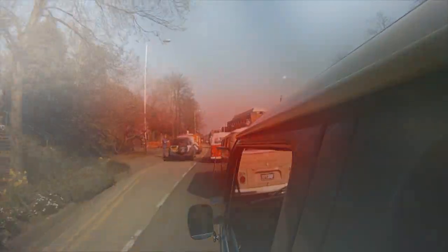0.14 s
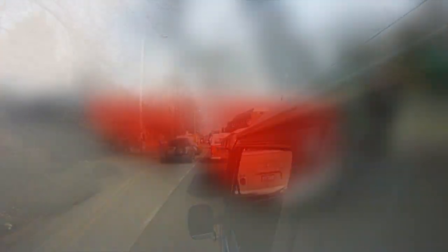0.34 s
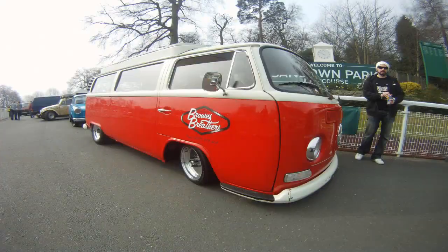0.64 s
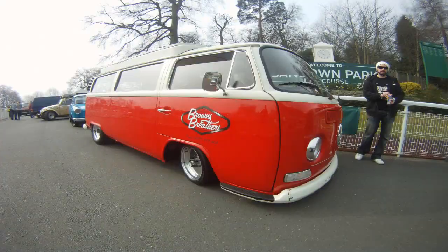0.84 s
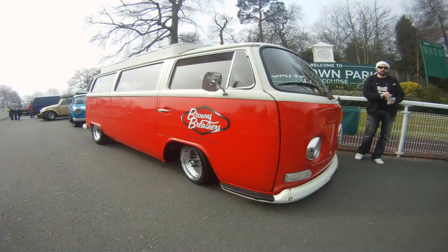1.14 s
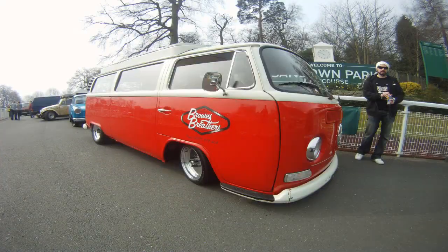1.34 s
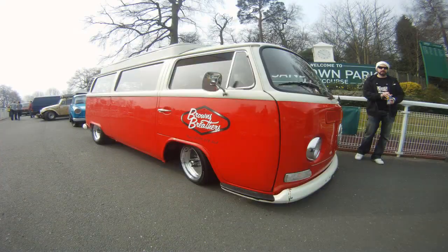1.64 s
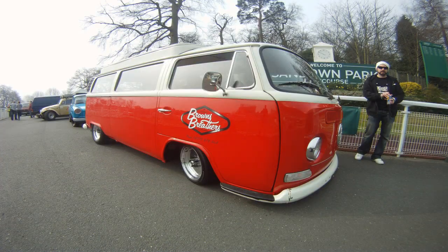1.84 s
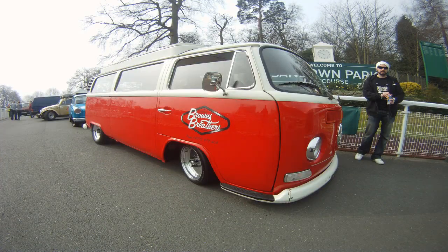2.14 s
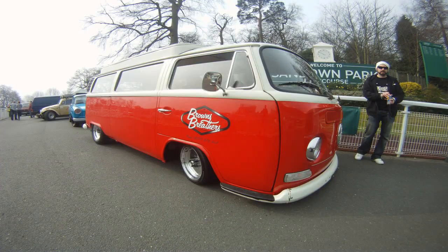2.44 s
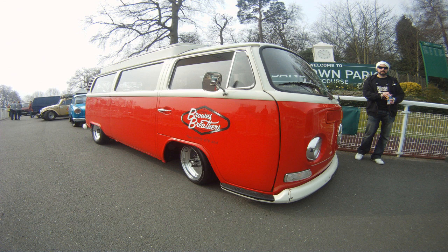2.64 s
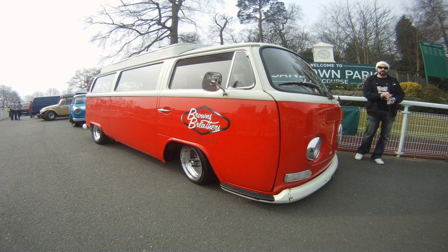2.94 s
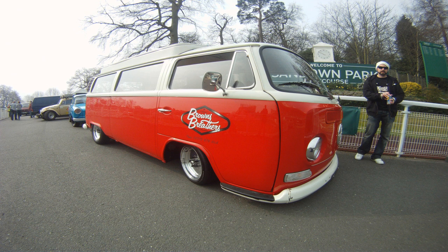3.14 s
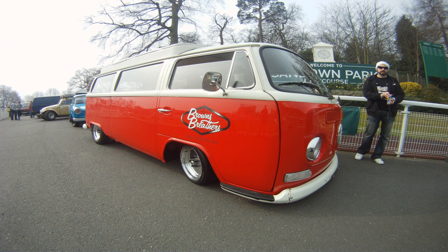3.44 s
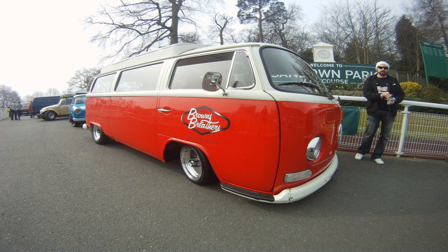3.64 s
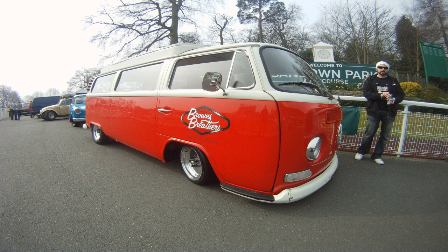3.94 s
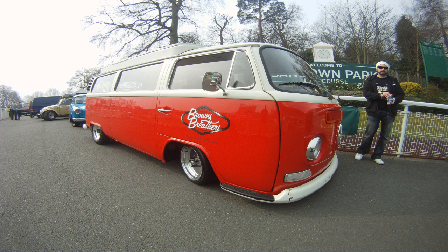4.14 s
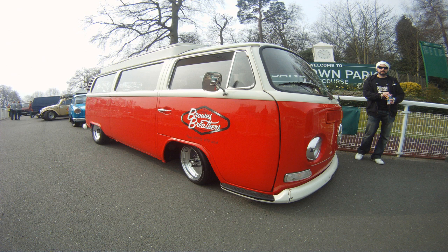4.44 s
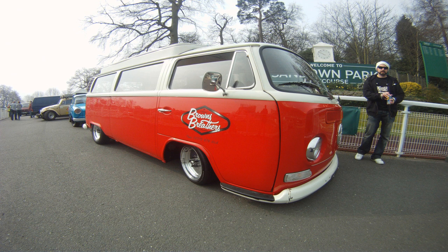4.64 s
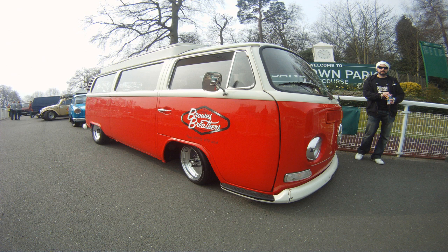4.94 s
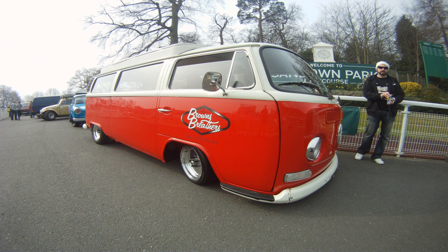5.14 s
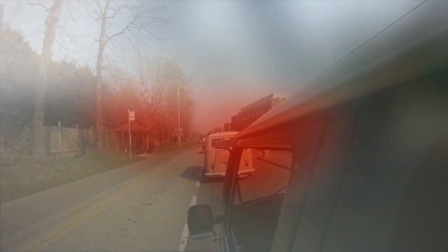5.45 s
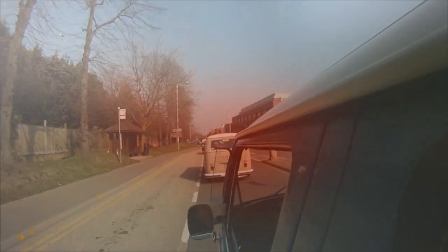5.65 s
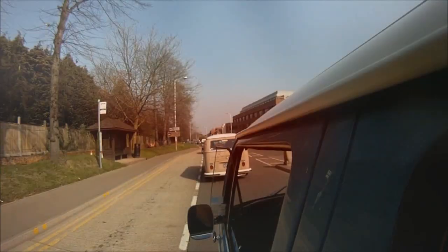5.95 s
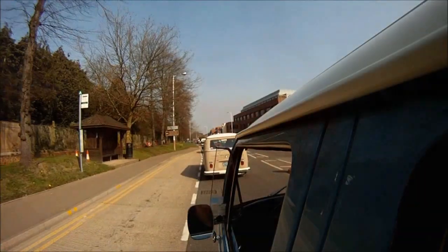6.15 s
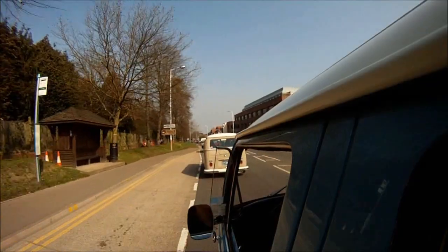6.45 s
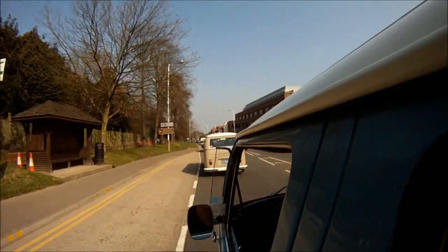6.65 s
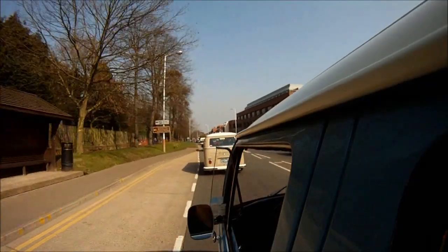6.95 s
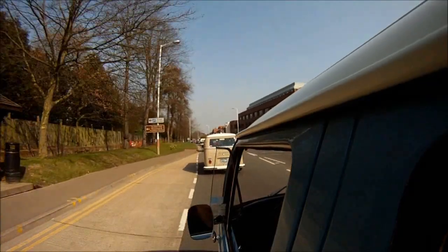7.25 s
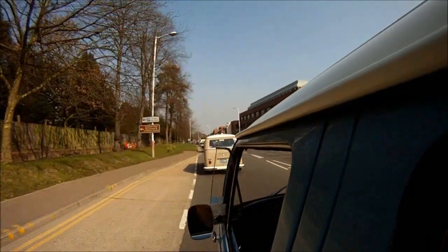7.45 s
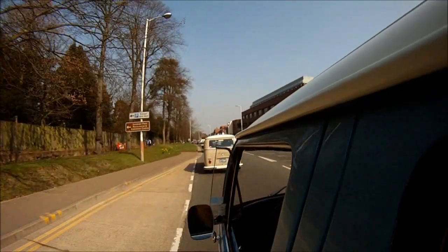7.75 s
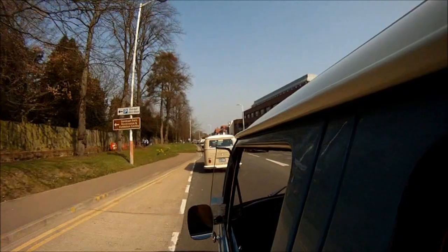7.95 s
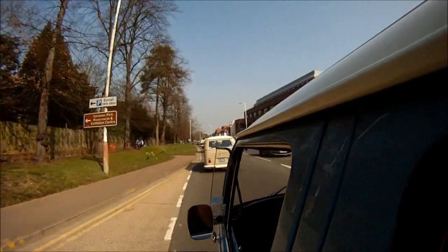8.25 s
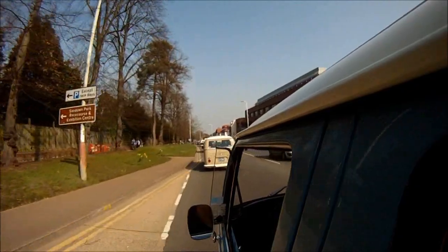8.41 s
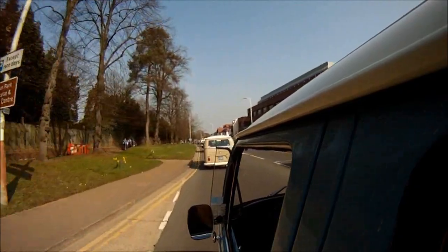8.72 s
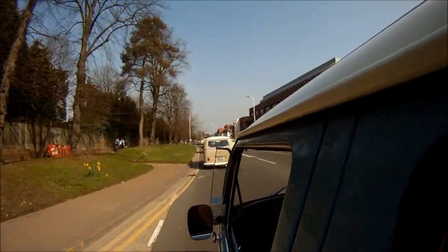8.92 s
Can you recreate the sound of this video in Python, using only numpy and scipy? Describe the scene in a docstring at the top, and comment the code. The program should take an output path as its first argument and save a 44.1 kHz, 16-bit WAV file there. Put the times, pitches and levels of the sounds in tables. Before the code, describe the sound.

An old van's air-cooled engine slows, then pulls away twice with rising growl, over road rumble, booming bumps and a brief metallic rattle.

```python
"""On the outside of an old van with an air-cooled flat four: it slows, then pulls away twice.
The engine is a set of tones (orders) that swell as they cross resonances on the way from the exhaust.
Road noise is random sound ringing in the steel shell; bumps swell a deep boom. A short metallic rattle is
bursts of uneven clicks that ring a metal part, steady tones hum, and a low drone climbs and fades early.
A small camera on the van's side samples at 12 kHz and holds each sample, mirroring sound into the treble."""
import sys
import numpy as np
from scipy import signal
from scipy.io import wavfile
from scipy.ndimage import uniform_filter1d

SR = 44100
rng = np.random.default_rng(int(sys.argv[2]) if len(sys.argv) > 2 else 0)


def amplitude_ratio(level_db):
    """Convert a level in decibels to the matching linear amplitude (field) ratio."""
    exponent = np.asarray(level_db, float) / 20
    return 10 ** exponent


def dump(signal):
    """Clip the signal to [-1, 1] and save it as 16-bit WAV at the path in sys.argv[1]."""
    limited = np.clip(np.atleast_2d(signal).T, -1, 1)
    pcm = np.round(limited * 32767).astype(np.int16)
    wavfile.write(sys.argv[1], SR, pcm)


N = 400428  # length in output samples
CAMERA_HZ, REPEAT = 12000, 4  # the camera's sample rate, and how many times it repeats each sample


def evened(x):
    """Scales a sound to rms 1."""
    return x / np.sqrt(np.mean(x ** 2) + 1e-20)


def columns(rows, t):
    """Reads each column of a curve at the times t."""
    s, *values = np.transpose(rows)
    return [np.interp(t, s, v) for v in values]


def split(hz, edge_hz, steep=3):
    """Share of the gain that lies above an edge; a larger steep makes a sharper edge."""
    return 1 / np.sqrt(1 + (edge_hz / (hz + 1e-3)) ** (2 * steep))


def wander(count, t, rate):
    """Rows of slow chance, rms 1, made of ten sines up to the rate in Hz, the slow ones strongest."""
    f = np.geomspace(rate / 12, rate, 10)
    phase = rng.random((count, len(f), 1))
    sines = np.sin(2 * np.pi * (f[:, None] * t + phase))
    return evened(np.sum(sines / np.sqrt(f)[:, None], 1))


def ringing(modes, hz, steep=1.36, floor_db=-62):
    """Gain of a set of resonances: their powers add, above a small floor."""
    power = sum(amplitude_ratio(db) ** 2 / (1 + (2 * (hz - f) / width) ** 2) ** steep for f, width, db in modes)
    return np.sqrt(power + amplitude_ratio(floor_db) ** 2)


# edges of three neighbouring bands: f/Hz
BAND_EDGES = (45, 130, 290, 720)


def bands(hz):
    """Shares of the gain in three neighbouring bands."""
    above = [split(hz, edge, steep=5) for edge in BAND_EDGES]
    return [low * np.sqrt(1 - high ** 2) for low, high in zip(above, above[1:])]


# steady humming tones: f/Hz, peak level/dB
HUM_TONES = [(195, -38), (389, -46), (783, -56)]


def hum(t):
    """Steady tones that waver a little in level and phase."""
    waver = wander(2 * len(HUM_TONES), t, 4)
    tones = 0
    for k, (hz, db) in enumerate(HUM_TONES):
        turns = hz * t + 0.11 * waver[-1 - k]
        tones += amplitude_ratio(db + 1.0 * waver[k]) * np.sin(2 * np.pi * turns)
    return tones


# a low drone, perhaps a neighbouring engine: t/s, f/Hz, level/dB
DRONE_PATH = [(0.0, 104, -32), (1.0, 104.5, -30.5), (1.5, 108, -37.5), (2.2, 118, -36.5), (2.7, 126, -46),
              (3.2, 135, -40), (3.7, 138, -50)]


def drone(t):
    """A climbing tone of wavering level, with a weaker partner a fourth below."""
    hz, db = columns(DRONE_PATH, t)
    turns = np.cumsum(hz) / CAMERA_HZ
    upper, lower = amplitude_ratio(db + 4.1 * wander(2, t, 12)) * (t < DRONE_PATH[-1][0])
    partner = amplitude_ratio(-3) * lower * np.sin(2 * np.pi * turns * 3 / 4)
    return np.sqrt(2) * (upper * np.sin(2 * np.pi * turns) + partner)


# resonances of the shell and the camera mount: f/Hz, width/Hz, level/dB (only the balance counts)
SHELL_MODES = [(29.8, 5.5, -17.5), (92.8, 12, 5.5), (103, 6.4, -14), (163, 16, -4.5), (212.3, 29.5, -9.5),
               (262, 28, -38), (449, 78, -35), (552, 113, -27), (636, 16, -29), (737, 62, -28),
               (750, 19, -49), (903.4, 67, -25), (1100, 98, -28.5), (1556, 174, -33), (2135, 136, -24),
               (2320, 420, -28.5), (2715, 56, -26.5), (3200, 320, -31.5), (3724, 550, -31.5),
               (4420, 940, -36.5), (5220, 810, -36)]


def shaken(t, shape, size, patchy_db, flicker_db):
    """Noise of random short-time spectra through the shell, in patches, with a flicker shared by all bins."""
    frames, hz = len(t) * 4 // size + 5, np.fft.rfftfreq(size, 1 / CAMERA_HZ)
    a, b, patches = rng.standard_normal((frames, len(hz), 3)).T
    # smoothing over 12 bins and 8 frames turns chance into patches
    patches = evened(uniform_filter1d(uniform_filter1d(patches, 12, 0), 8, 1))
    flicker = evened(uniform_filter1d(rng.standard_normal(frames), 3))
    tint = (ringing(SHELL_MODES, hz) * shape(hz))[:, None]
    z = (a + 1j * b) * tint * amplitude_ratio(patchy_db * patches + flicker_db * flicker)
    return evened(signal.istft(z, nperseg=size, noverlap=size * 3 // 4)[1][:len(t)])


# how hard tyres and air shake the shell: t/s, level/dB
ROAD_SHAKE = [(0.0, -43), (1.3, -44.5), (2.3, -45), (2.65, -45), (3.0, -41.5), (3.46, -38), (3.75, -41.5),
              (4.2, -36), (4.58, -35.5), (4.85, -39.5), (5.5, -41.5), (6.6, -39), (7.0, -40), (7.18, -41),
              (7.3, -43), (7.5, -41), (7.65, -39), (7.77, -43), (8.09, -35.5), (8.3, -35), (8.52, -32.5),
              (8.72, -34.5), (9.08, -37)]
# rumble of the panels, one row for each of the three bands:
# calm level/dB, dB per dB of shaking, dB per dB of engine speed
PANEL_RUMBLE = [(-33.5, 0.66, 0.1), (-39.5, 0.5, 0.48), (-38.5, 0.27, 0.38)]
# bumps in the road that swell the boom: t/s, level/dB
ROAD_BUMPS = [(0.25, -38), (1.3, -37), (1.72, -29.5), (2.1, -34), (2.68, -38), (3.8, -26), (4.22, -27),
              (5.3, -36), (5.65, -37), (6.42, -28), (6.9, -28), (7.21, -30), (7.7, -33), (8.07, -27),
              (8.47, -25), (9.0, -34)]


def road(t):
    """Tyres and air shake the shell: hiss above, rumble in the panels, and the lowest boom of the cabin."""
    calm_db, calm_speed = -42, 15  # shaking in dB and engine cycles a second at which a layer has its calm level
    # (calm level in dB, dB per dB of shaking, dB per dB of engine speed)
    roar_level, hiss_level, fizz_level = (-44, 0.82, 0.72), (-41.5, 0.97, -0.065), (-54.5, 1.09, 0.05)
    boom_hz, boom_db, boom_waver_db = 28.8, -33.5, 1  # lowest mode of the cabin
    bump_rise_s, bump_fall_s = 0.051, 0.19
    firing_shake_db, bump_shake_db = -15.5, -6.5  # how much firing and bumps drive the largest panels

    shake_db = columns(ROAD_SHAKE, t)[0] - calm_db
    roar = shaken(t, lambda hz: split(hz, 863) * (1 - split(hz, 1630, steep=14.4)),
                  size=512, patchy_db=-1.85, flicker_db=0.5)
    hiss = shaken(t, lambda hz: split(hz, 2000, steep=1.8) * (1 - split(hz, 4170)),
                  size=256, patchy_db=0.18, flicker_db=0.7)
    fizz = shaken(t, lambda hz: split(hz, 5030), size=256, patchy_db=-0.3, flicker_db=0.9)
    panels = [shaken(t, lambda hz: bands(hz)[k], size=2048, patchy_db=3.05, flicker_db=1.06)
              for k in range(3)]
    swell, gusts = wander(1, t, 5.5)[0], wander(1, t, 24)[0]
    firing_db = columns(THROTTLE, t)[0]
    speed_db = 20 * np.log10(columns(ENGINE_SPEED, t)[0] / calm_speed)

    levels = [roar_level, hiss_level, fizz_level] + PANEL_RUMBLE
    layers = [roar, hiss, fizz] + panels
    noise = sum(amplitude_ratio(db + share * shake_db + follow * speed_db) * layer
                for (db, share, follow), layer in zip(levels, layers))
    bumps = sum(amplitude_ratio(db) * np.exp(-((t - s) / np.where(t < s, bump_rise_s, bump_fall_s)) ** 2)
                for s, db in ROAD_BUMPS)
    noise += (amplitude_ratio(firing_shake_db + firing_db) + amplitude_ratio(bump_shake_db) * bumps) * panels[0]

    boom_size = amplitude_ratio(boom_db + boom_waver_db * swell) + bumps
    boom = np.sqrt(2) * np.sin(2 * np.pi * boom_hz * t)
    boom += amplitude_ratio(-7.5) * shaken(t, lambda hz: 1 - split(hz, 69), size=2048, patchy_db=-3.4, flicker_db=0.5)
    return amplitude_ratio(0.58 * gusts) * noise + boom_size * boom


# bursts of the metallic rattle: t/s, length/s, level/dB (before the metal rings)
RATTLE_BURSTS = [(6.907, 0.0163, -28.5), (7.166, 0.024, -40), (7.285, 0.011, -41)]
# ringing tones of the metal part: f/Hz, relative level/dB, time to fall 60 dB/s
RATTLE_TONES = [(1060, 2, 0.017), (1610, 9, 0.0057), (2225, -10, 0.018), (2730, 1, 0.038), (3420, 3, 0.028),
                (5230, -9, 0.084)]


def rattle(t, clicks_per_s=1100, noise_db=-7):
    """Bursts of quick uneven clicks ring a metal part, over a little plain noise."""
    burst = sum(amplitude_ratio(db) * np.sin(np.pi * np.clip((t - s) / length, 0, 1)) ** .5
                for s, length, db in RATTLE_BURSTS)
    chance, size = rng.random((len(t), 2)).T
    clicks = burst * (chance < clicks_per_s / CAMERA_HZ) * (0.26 + size)
    u = t[:1500]
    ring = sum(amplitude_ratio(db - 60 * u / t60) * np.sin(2 * np.pi * hz * u) for hz, db, t60 in RATTLE_TONES)
    noise = amplitude_ratio(noise_db) * burst * rng.standard_normal(len(t))
    return signal.oaconvolve(clicks, ring)[:len(t)] / 2 + noise


# engine speed (one cycle is two crank turns and four firings): t/s, cycles per second
ENGINE_SPEED = [(0.0, 13.1), (0.35, 13.0), (0.8, 12.48), (1.6, 12.15), (2.3, 12.15), (3.0, 13.12),
                (3.7, 14.55), (4.35, 16.5), (4.8, 18.03), (5.4, 18.92), (5.9, 18.93), (6.2, 19.12),
                (6.9, 20.56), (7.85, 22.95), (8.4, 25.11), (8.75, 26.78), (9.08, 28.85)]
# throttle: t/s, firing tone level/dB, load on the other orders/dB
THROTTLE = [(0.0, -46, -4.5), (1.0, -40, -5.5), (2.0, -43, -2), (2.6, -50, -0.5), (3.2, -33, 1.5),
            (3.9, -39, 1.5), (4.1, -23, 1.5), (4.4, -20, 4), (4.72, -19.5, 7), (4.97, -28, 3.5),
            (5.1, -20, 0), (5.5, -17.5, 1.5), (6.0, -23.5, 2), (6.14, -57, 1.7), (6.53, -29, 4.5),
            (6.9, -17.5, 5), (7.2, -15, 1.5), (7.45, -13.5, 0), (7.7, -13, -0.2), (8.1, -20, 7.5),
            (8.4, -15.5, 8.5), (8.5, -29, 11), (8.62, -16, 10), (9.08, -22.5, 8.5)]
# orders of the cycle that stand out or fall back: order, first pull level/dB, second pull level/dB
ORDER_STRENGTH = [(3, -3, 0), (5, -1, 3), (6, 5, -1), (8, 8, 3), (9, 2, 8), (11, -4.5, 0), (12, 7, -1),
                  (13, -2.5, 2), (14, -6, -2), (15, -3, -3), (16, 9, 1), (17, -2, 2), (18, -4, 0),
                  (19, -3, 2), (20, 8, 0), (21, -6, -3), (22, -1, -3), (23, 7, 4), (24, -3, 2), (25, -3, 3),
                  (26, -2, 2), (27, 2, 2), (28, 2, 7), (29, 1, 6), (30, 5, 0), (31, 6, -2), (32, 8, 1),
                  (33, 3, 1), (37, 1, 3), (39, 1, 3)]
# how orders follow the load, one row for each of the three bands: level at zero load/dB, dB per dB of load
ORDER_LOAD = [(-29.5, 1.09), (-25, 1.57), (-29, 1.45)]
# resonances on the way from the exhaust to the camera: f/Hz, width/Hz, level/dB
EXHAUST_MODES = [(65.8, 17, -2), (86.6, 15, 0.5), (103.2, 31, -9), (140, 30, -26), (174.3, 30, -20),
                 (200, 15.5, -13.5), (224.6, 28, -22.5), (263.8, 28.7, -21.5), (320.3, 35, -27),
                 (382, 37, -35), (434, 28, -28), (481, 28, -26), (558, 38.6, -18.5), (600, 38, -24),
                 (724, 40, -32.5)]


def engine(t):
    """Each order of the cycle is a tone, loud at a resonance; uneven firing shakes its size and phase."""
    second_pull_s, change_s = 5.06, 0.1  # the mix of orders changes between the two pulls
    coarse, fine = t[::32], t[::4]  # all orders lie under 1.5 kHz, so fewer samples are enough
    hz, = columns(ENGINE_SPEED, coarse)
    order = np.arange(1, 51)[:, None]

    pulls_db = np.full((50, 2), -1.)  # orders that are not listed
    pulls_db[[round(row[0]) - 1 for row in ORDER_STRENGTH]] = [row[1:] for row in ORDER_STRENGTH]
    second = (1 + np.tanh((coarse - second_pull_s) / change_s)) / 2
    strength_db = pulls_db @ [1 - second, second]
    gain = amplitude_ratio(strength_db + 2.2 * wander(50, coarse, 7)) * ringing(EXHAUST_MODES, order * hz, steep=1.8)
    firing_db, load_db = columns(THROTTLE, coarse)
    gain *= sum(share * amplitude_ratio(db + follow * load_db)
                for share, (db, follow) in zip(bands(order * hz), ORDER_LOAD))

    # orders 1, 2 and 4 get levels of their own
    gain[0] = 0
    # order 2: the crank turn rocks the whole van
    gain[1] = amplitude_ratio(-38 + 0.71 * load_db - 4 * second + 6.1 * wander(1, coarse, 5)[0])
    # order 4: the firing tone
    gain[3] = np.sqrt(2) * amplitude_ratio(firing_db + 1.9 * wander(1, coarse, 8.9)[0])

    # phases in turns: high orders start closer together and wander more
    phase = rng.random((50, 1)) * np.where(order > 22, .55, 1)
    phase = phase + .13 * wander(50, coarse, 9) * order / 50
    turns = np.cumsum(columns(ENGINE_SPEED, fine)[0]) * 4 / CAMERA_HZ
    tones = 0
    for k, g, p in zip(order[:, 0], gain, phase):
        angle = 2 * np.pi * (k * turns + np.interp(fine, coarse, p))
        tones = tones + np.interp(fine, coarse, g) * np.sin(angle)
    return signal.resample_poly(tones, 4, 1)[:len(t)]


# sudden dips of the whole level: t/s, depth/dB (0 leaves the level alone), recovery/s
LEVEL_DIPS = [(4.635, 0, 0.18), (7.214, 4.5, 0.29), (8.126, 7.5, 0.06)]


def scene():
    """All sources, built at the camera's rate, under the sudden dips of level."""
    t = np.arange(N * CAMERA_HZ // SR + 2) / CAMERA_HZ
    # each dip sets in over 2.5 ms and recovers slowly
    dip_db = sum(db * np.clip((t - s) / 0.0025, 0, 1) * np.exp(-np.abs(t - s) / back)
                 for s, db, back in LEVEL_DIPS)
    mix = (engine(t) + road(t) + hum(t) + rattle(t) + drone(t)) * amplitude_ratio(-dip_db)
    return signal.resample_poly(mix, 147, 40)[None, :N]  # 12 kHz to 44.1 kHz


def low_pass(x):
    """Removes everything above the highest recorded frequency."""
    return signal.sosfilt(signal.butter(12, 15460, fs=SR, output="sos"), x)


def record(dry):
    """12 kHz samples are held for four steps of 48 kHz, which mirrors them upward, then brought to 44.1 kHz."""
    # a gentle filter lets some sound above 6 kHz fold back
    sampled = signal.resample_poly(dry[0], 40, 147, window=("kaiser", 2.0))
    held = signal.resample_poly(np.repeat(sampled, REPEAT), 147, 160)[:N]
    return low_pass(held[None])


dry = scene()
out = record(dry)
dump(out)
```